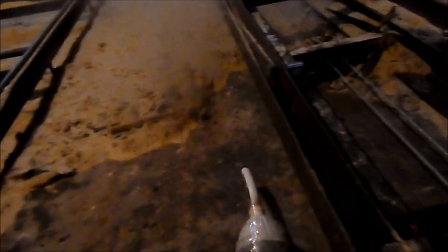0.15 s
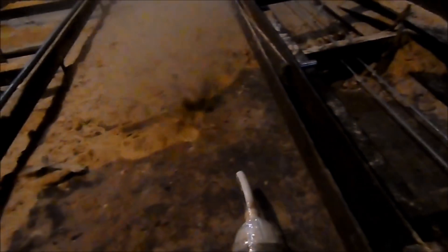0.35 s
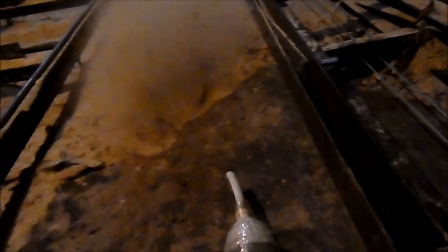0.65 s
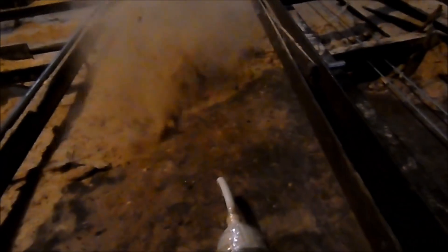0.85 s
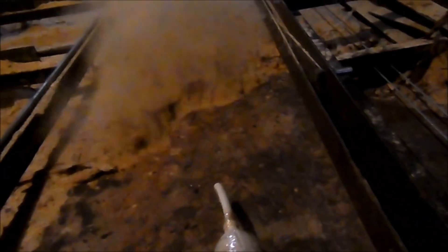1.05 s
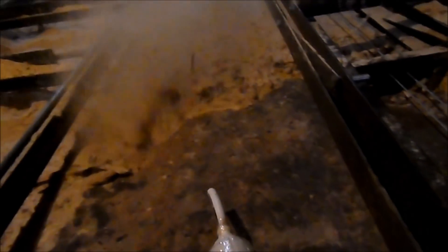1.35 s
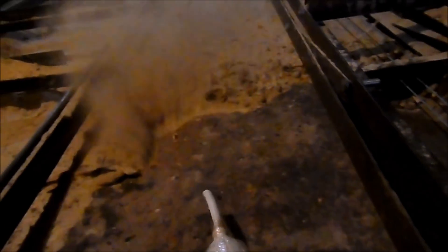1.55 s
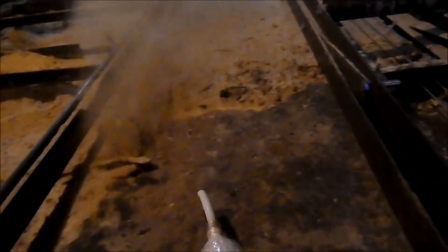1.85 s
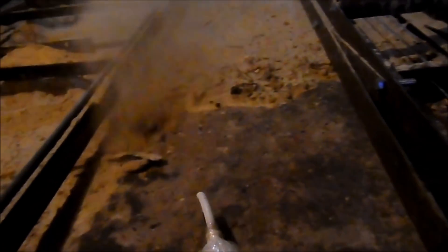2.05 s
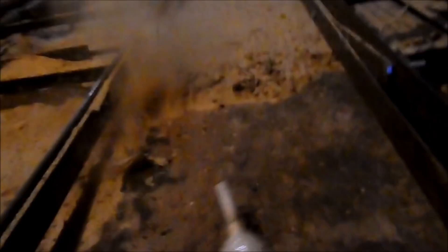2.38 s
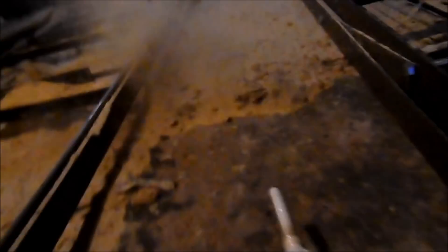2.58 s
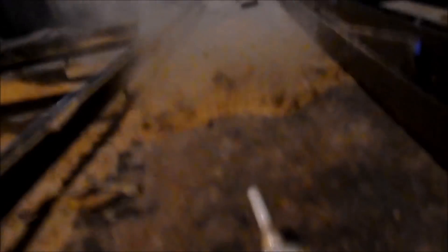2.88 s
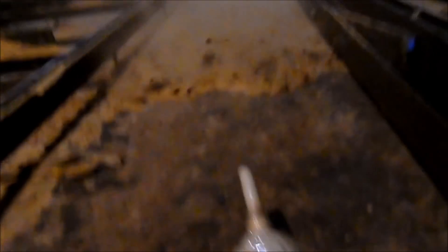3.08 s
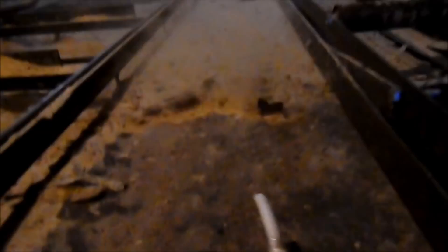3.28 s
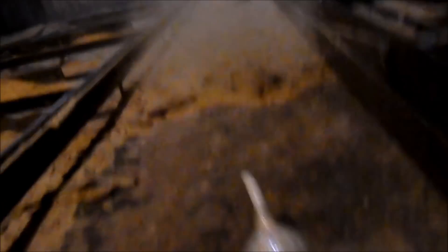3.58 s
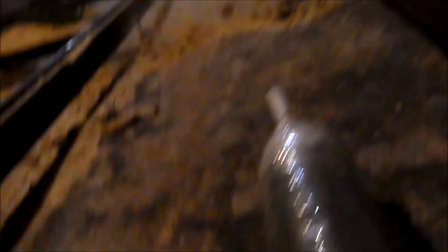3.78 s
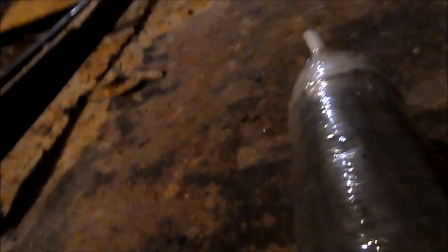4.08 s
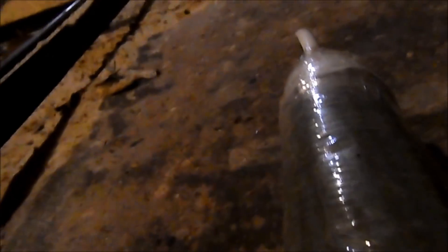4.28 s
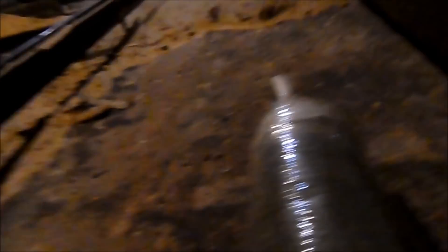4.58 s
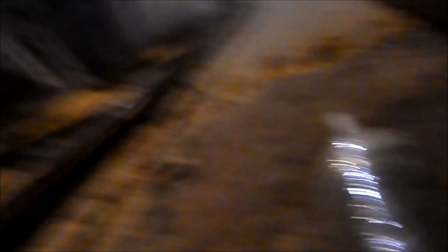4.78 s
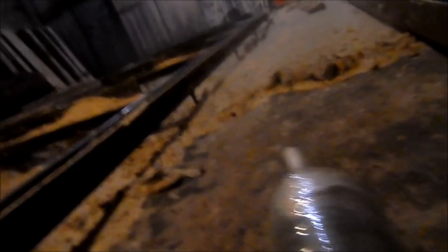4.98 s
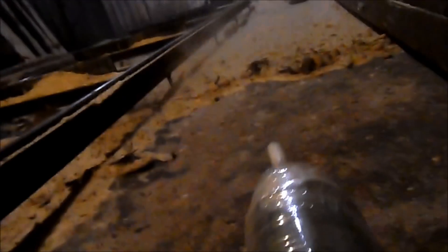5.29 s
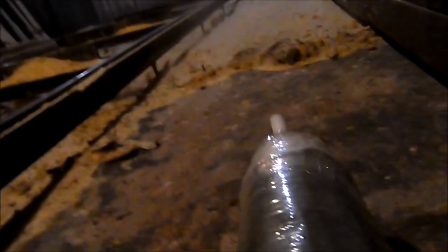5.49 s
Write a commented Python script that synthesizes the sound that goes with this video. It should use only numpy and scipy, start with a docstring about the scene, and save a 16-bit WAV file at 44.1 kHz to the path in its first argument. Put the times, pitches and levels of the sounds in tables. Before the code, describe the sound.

Already running at the start, a blower pushes out a broad, sharp rush of air over a dusty floor between metal rails. Its motor drones steadily with brief buzzy bursts, and the fan tone wavers and sags slightly. Midway the hiss turns duller and the motor side more exposed, with gusts thudding on the close microphone; the fan whine stands out near the end. No stop, little room sound, centred image.

```python
"""A blower is swept by hand over a dusty floor between metal rails. From the start a motor hums on a stack of
orders with bursts of buzz, a fan adds a blade tone that sags as the load changes, and noise hisses from the
nozzle with an echo notch that slides as the nozzle swings. Gusts thump on the microphone from about 0.6 s,
over a faint breeze, and thin whistles glide and fade from 0.8 s. Tones are wavering sines, air is noise built
from random short-time spectra, and gusts are low-passed noise. Both channels are alike."""
import sys
import numpy as np
from scipy import signal
from scipy.io import wavfile
from scipy.ndimage import uniform_filter1d

SR = 44100
rng = np.random.default_rng(int(sys.argv[2]) if len(sys.argv) > 2 else 0)


def transcribe(u):
    """Save the signal u as a 16-bit wav file named by the first command-line argument.

    u: samples, shape (n,) or (channels, n), limited to [-1, 1]; the rate is SR.
    q: integer samples, one column per channel.
    """
    v = np.clip(np.atleast_2d(u).T, -1, 1)
    q = np.round(v * 32767).astype(np.int16)
    wavfile.write(sys.argv[1], SR, q)


N = 248724  # length in samples


def gain_of(db):
    """Decibel law: 20 dB is a factor of ten in amplitude."""
    return 10 ** (np.asarray(db) / 20)


def evened(x):
    """Normalisation: scale a signal to an rms of 1."""
    return x / np.sqrt(np.mean(x ** 2) + 1e-20)


def read(points, hz):
    """Spectral envelope: interpolate levels in dB over log frequency, near silence outside."""
    f, value = np.transpose(points)
    return np.interp(np.log(hz + 1), np.log(f + 1), value, left=-120, right=-120)


def follow(rows, t):
    """Piecewise-linear control: columns of a curve table at the times t."""
    s, *columns = np.transpose(rows)
    return [np.interp(t, s, c) for c in columns]


def drift(rate_hz):
    """Slow random modulation: sines of random phase up to rate_hz, together of rms 1."""
    t = np.arange(0, N / SR + .01, .002)
    slow = 0
    for f in rate_hz * np.geomspace(.05, 1, num=16):
        slow = slow + np.sin(2 * np.pi * (f * t + rng.random())) / np.sqrt(f)
    return np.interp(np.arange(N) / SR, t, evened(slow))


def tone(hz, db, width_hz=0., waver_db=0., waver_hz=8.):
    """Phase integration: a sine whose pitch trembles by width_hz rms and whose level wavers about db."""
    turns = np.cumsum(hz + width_hz * drift(30.)) / SR + rng.random()
    level = gain_of(db + waver_db * drift(waver_hz))
    return np.sqrt(2) * level * np.sin(2 * np.pi * turns)


def rumble(hz):
    """Low-pass filtering: two one-pole stages make noise that falls away above hz, rms 1."""
    r = np.exp(-2 * np.pi * hz / SR)
    once = signal.lfilter([1], [1, -r], rng.standard_normal(N))
    return evened(signal.lfilter([1], [1, -r], once))


# how the blower is held, also followed by the fan and the air:
# time_s, aim (near 1 nozzle side, near -1 motor side), stream_swell_db, top_octave_db (before the air's lift)
POSE = [(0, 0.95, 3, -40), (.4, .75, 4.5, -38), (.7, 0.37, 3.5, -37), (.85, 0.39, 1, -35),
        (1.7, 0.37, 0, -36), (2.15, 0.44, -2, -36), (2.5, 0.24, -0.5, -34.5), (2.58, 0.29, 0.5, -31),
        (2.75, -0.33, -1, -34.5), (2.9, -.5, 2.5, -38), (3.15, -0.79, -0.5, -40), (3.45, -0.68, -3.5, -47),
        (3.7, -1.14, -0.5, -42), (3.95, -0.43, 1, -38), (4.8, -0.48, 1.5, -35), (5.1, -.6, 1.5, -36),
        (5.3, -0.71, 3, -38), (5.64, -0.45, 2.5, -36)]
# motor hum: time_s, hum_db, octave_db
HUM = [(0.0, -24.5, -43), (0.3, -27.5, -41), (0.52, -24.5, -35.5), (1.13, -21.5, -32.5),
       (1.3, -22.5, -35.5), (1.48, -20, -32), (2.32, -19.5, -36), (2.97, -21, -29), (3.24, -19.5, -36),
       (3.3, -20.5, -42), (3.36, -21.5, -32), (3.69, -21.5, -35.5), (3.83, -23, -30), (4.23, -25, -34.5),
       (5.28, -30.5, -28.5), (5.37, -25.5, -32), (5.59, -22.5, -30.5), (5.64, -27, -37)]
# third order, fourth order, whine, buzz between bursts: level_db at zero aim and swell, tilt_db per unit of aim
TURNING = [(-47.5, -4.5), (-49, -9), (-51.5, -9.5), (-44, 2.5)]
# flares of the buzz: start_s, length_s, level_db
BUZZES = [(0.035, 0.12, -39.5), (0.355, 0.17, -36.5), (0.553, 0.13, -34), (0.888, 0.15, -39),
          (1.19, 0.153, -35), (1.525, 0.22, -36.5), (2.29, 0.25, -40.5), (3.402, .13, -39),
          (3.845, 0.31, -38), (5.31, .3, -32.5)]
# weaker orders of the hum: multiple of the hum pitch, level_db at zero swell
HUM_ORDERS = [(1.5, -59.5), (5, -60), (7, -49), (8, -54), (9, -47.5), (10, -56), (11, -48.5), (18, -50),
              (27, -65)]
# faint tone just above the hum that beats with it: time_s, level_db
BEAT = [(0, -46), (1, -47), (2.7, -48), (3.2, -39), (3.9, -50), (4.2, -45), (4.5, -39), (4.8, -46),
        (5.3, -37), (5.64, -41)]
# other steady tones, a low mains hum near 100 Hz, then fuzzier motor tones:
# pitch_hz, width_hz (four times the rms tremble), level_db
TONES = [(102.6, 5.4, -62), (1040, 4.8, -88), (1120, 6.9, -63), (1236, 2.8, -55), (1565, 3.1, -50),
         (1695, 7.9, -67), (1782, 4.9, -62), (2016, 7.5, -50), (2026, 8.5, -57), (2470, 11, -49.5),
         (3576, 11, -55), (4460, 13, -61), (4920, 9.2, -49.5), (5420, 15.2, -51), (5680, 23, -48),
         (6180, 6.7, -49), (7600, 12, -53)]
HUM_HZ, BEAT_HZ = 463.9, 476
BUZZ_HZ, BUZZ_PAIR_HZ, WHINE_HZ = 1502, 1549, 3358
BUZZ_EDGE_S = 0.014


def motor():
    """Harmonic series with amplitude modulation: hum, orders, buzz, whine and other steady tones, one of mains hum."""
    t = np.arange(N) / SR
    aim, swell_db, _ = follow(POSE, t)
    hum_db, octave_db = follow(HUM, t)
    third_db, fourth_db, whine_db, buzz_db = (db + tilt_db * aim for db, tilt_db in TURNING)
    third_db = third_db + 0.96 * swell_db
    fourth_db = fourth_db + 0.22 * swell_db

    # turbulence shakes the level: noise on both sides of the line
    hz = HUM_HZ + 0.3 * drift(12.)
    out = tone(hz, hum_db) * (1 + 0.056 * rumble(30.0))
    out += tone(2 * hz, octave_db) * (1 + 0.091 * rumble(33.0))
    out += tone(3 * hz, third_db, waver_db=0.5)
    out += tone(4 * hz, fourth_db, waver_db=1.5)

    flares = 0
    for start, length, db in BUZZES:
        edge_distance = np.minimum(t - start, start + length - t)
        flares = flares + gain_of(db) * np.clip(edge_distance / BUZZ_EDGE_S, 0, 1)
    buzz = tone(BUZZ_HZ, 0, width_hz=1.7, waver_db=2.5, waver_hz=24.87)
    buzz += tone(BUZZ_PAIR_HZ, -8.5, width_hz=2.2, waver_db=5.5, waver_hz=2.93)
    out += np.maximum(flares, gain_of(buzz_db)) * buzz

    out += tone(WHINE_HZ, whine_db, width_hz=6.0, waver_db=6.0, waver_hz=25.27)
    for k, db in HUM_ORDERS:
        out += tone(k * hz, db + 0.93 * swell_db, width_hz=1.4, waver_db=2.5, waver_hz=15.0)
    out += tone(BEAT_HZ, *follow(BEAT, t), width_hz=3.9, waver_db=0.5, waver_hz=4.2)
    for f, width_hz, db in TONES:
        out += tone(f, db, width_hz=0.25 * width_hz, waver_db=1.5, waver_hz=15.)
    return out


# fan levels: time_s, blade_db, others_db (reference for most upper multiples and shaft orders)
FAN = [(0, -43, -60), (.17, -34.5, -58), (.4, -45.5, -58), (.6, -46, -62), (.7, -33.5, -62),
       (1.05, -31.5, -60), (1.36, -33.5, -58), (1.46, -42, -56), (1.51, -33, -54), (1.63, -43, -58),
       (1.7, -33.5, -56), (2.08, -53, -60), (2.28, -41, -58), (2.72, -42, -56), (2.83, -35.5, -65),
       (3.15, -33.5, -45), (3.58, -40.5, -55), (3.75, -38, -54), (3.92, -36, -45), (4.15, -32, -44),
       (5.2, -27.5, -39.5), (5.3, -32, -43), (5.45, -43, -40.5), (5.64, -32, -42)]
# pitch of the ten-bladed fan, which slows under load: time_s, blade_hz
FAN_SPEED = [(0, 2960), (1.3, 2933), (2.3, 2893), (3.1, 2914), (3.6, 2870), (3.9, 2845), (4.15, 2861),
             (5.64, 2870)]


def fan():
    """Blade passing: a tone at ten times the shaft rate, its multiples, and shaft orders just below them."""
    t = np.arange(N) / SR
    aim = follow(POSE, t)[0]
    blade_db, others_db = follow(FAN, t)
    hz = follow(FAN_SPEED, t)[0] + 4.0 * drift(25.)
    out = tone(hz, blade_db) * (1 + 0.12 * rumble(16.0))
    second_db = -44 + .4 * (blade_db + 30) + 3.9 * aim
    out += tone(2 * hz, second_db, waver_db=2.0, waver_hz=18.0)
    fourth = tone(4 * hz, others_db + 1.5, width_hz=25., waver_db=4.5, waver_hz=20.)
    out += fourth * (1 + 0.27 * rumble(190.0))
    for k, db in ((39 / 10, -4.), (5, -7.)):
        out += tone(k * hz, others_db + db, width_hz=14.4, waver_db=0.5, waver_hz=20.)
    return out + tone(9 / 10 * hz, others_db - 1.0, waver_db=3., waver_hz=20.)


def noise(power, patchy_db, flicker_db):
    """Inverse short-time Fourier synthesis: random spectra (bins x frames) with patches and broad flicker."""
    a, b, patches = rng.standard_normal((power.shape[1], power.shape[0], 3)).T
    patches = uniform_filter1d(patches, size=14, axis=0)  # across bins
    patches = evened(uniform_filter1d(patches, size=16, axis=1))  # across frames
    flicker = evened(uniform_filter1d(a, size=200, axis=0))  # shared by neighbouring bins
    z = (a + 1j * b) * np.sqrt(power) * gain_of(patchy_db * patches + flicker_db * flicker)
    return signal.istft(z * np.sqrt(3 / 8), nperseg=1024, noverlap=768)[1][:N]


# roar, rush, hiss, fizz: relative_level_db (before the lift), tilt_db per unit of aim, share of the swell
AIR = [(-39, -3, .8), (-38, -1, 1), (-36, 5.5, .4), (-38, 3.5, 0.6)]
# colour of each part of the stream: frequency_hz, relative_density_db per Hz
ROAR = [(20, -12), (100, -22), (300, -20), (600, -18), (900, -7), (1200, -13), (1600, -5), (2200, -9),
        (3000, -10.5), (4000, -25)]
RUSH = [(2500, -20), (3300, -5.5), (4000, -10.5), (5000, -7), (6000, -13.5)]
HISS = [(4800, -22.5), (5800, -4), (6800, -0.5), (7600, -5.5), (8600, -8.5), (9600, -12)]
FIZZ = [(8000, -10), (9200, -8), (10800, -5), (12000, -7), (13000, -11), (14500, -41)]
TOP = [(11000, -38), (12600, -7.5), (13600, -6), (14600, -7.5), (16500, -8.5), (19000, -13)]
# dip cut by the floor echo: time_s, notch_hz, depth_db (negative is a bump)
NOTCH = [(0, 8650, 8), (1, 9000, 4), (2.42, 9600, 2.5), (2.6, 7900, 8), (2.8, 6800, 4), (3, 7500, 0),
         (3.5, 7650, 1.5), (4, 8700, -2.5), (5.64, 9500, -1.3)]
UPPER_NOTCH_HZ, UPPER_NOTCH_SHARE = 13000, 0.6  # share of the main depth


def air():
    """Jet noise and echo interference: five bands swell apart with aim, under two sliding notches and a fixed one."""
    hz = np.fft.rfftfreq(1024, 1 / SR)
    t = np.arange(N // 256 + 5) * 256 / SR
    aim, swell_db, top_db = follow(POSE, t)
    levels_db = [db + tilt_db * aim + share * swell_db for db, tilt_db, share in AIR] + [top_db]
    power = 0
    for colour, db in zip((ROAR, RUSH, HISS, FIZZ, TOP), levels_db):
        shape = gain_of(2 * read(colour, hz))  # doubled dB: power, not amplitude
        power = power + np.outer(shape / shape.sum(), gain_of(2 * db))

    notch_hz, depth_db = follow(NOTCH, t)
    rows_hz = hz[:, None]
    dip_db = depth_db * np.exp(-((rows_hz - notch_hz) / 940.0) ** 2)
    dip_db += UPPER_NOTCH_SHARE * depth_db * np.exp(-((rows_hz - UPPER_NOTCH_HZ) / 710.0) ** 2)
    dip_db += 0.56 * depth_db * np.exp(-((rows_hz - 0.387 * notch_hz) / 760.0) ** 2)
    lift = gain_of(8.)
    return lift * noise(power * gain_of(-2 * dip_db), patchy_db=1.3, flicker_db=0.97)


# breeze between the gusts: time_s, level_db
BREEZE = [(0, -61), (.5, -56), (.75, -50), (1, -49), (1.12, -61), (2.9, -65), (3.4, -53), (4.2, -49),
          (5.64, -45)]
# gusts on the microphone: peak_s, level_db, length_s
GUSTS = [(0.636, -31, 0.068), (1.035, -34, 0.039), (3.176, -32, 0.058), (3.697, -23.5, 0.095),
         (3.78, -29, 0.11), (3.892, -32, .04), (4.095, -39, .04), (4.247, -38, 0.045), (4.322, -37, .06),
         (4.52, -35, 0.043), (4.596, -36.5, 0.077), (4.777, -31, 0.046), (4.914, -34, 0.045),
         (5.015, -33, 0.1), (5.172, -45, .05), (5.585, -32, 0.054)]
GUST_RISE_DB, GUST_FALL_DB = 19, 20  # drop one length before and after the peak


def gusts():
    """Turbulent pressure on a microphone: low swings of fairly even size, with a faster flutter on top."""
    t = np.arange(N) / SR
    level = gain_of(follow(BREEZE, t)[0])
    for peak, db, length in GUSTS:
        drop_db = np.maximum(GUST_RISE_DB * (peak - t), GUST_FALL_DB * (t - peak)) / length
        level = np.maximum(level, gain_of(db - drop_db))
    swings = rumble(47.0) + (0.043 + 2.2 * level) * rumble(83.0)  # hard gusts flutter more
    local_rms = np.sqrt(uniform_filter1d(swings ** 2, size=2500))
    return level * swings / local_rms


# whistles at the nozzle lip: start_s, length_s, first_hz, last_hz, level_db (at the top of the swell)
WHISTLES = [(0.798, 1.7, 6700, 7040, -41), (2.9, 0.57, 12000, 12100, -45), (3.498, .65, 3420, 3730, -38.5),
            (3.517, 0.42, 7000, 7460, -46), (3.9, 1.9, 11920, 11800, -47)]
SETTLE = 0.25  # share of the length in which the pitch settles
WHISTLE_FADE = 0.42  # roundness of the swell


def whistles():
    """Edge tones: thin sines glide exponentially to their last pitch, swell and fade as the nozzle turns."""
    out = 0
    for start, length, first_hz, last_hz, db in WHISTLES:
        u = np.clip((np.arange(N) / SR - start) / length, 0, 1)
        hz = last_hz + (first_hz - last_hz) * np.exp(-u / SETTLE)
        swell = abs(np.sin(np.pi * u)) ** WHISTLE_FADE * (u < 1)
        whistle = tone(hz, db, width_hz=12.4, waver_db=1.5, waver_hz=20.)
        out = out + swell * whistle * (1 + 0.2 * rumble(44.0))
    return out


def scene():
    """Superposition: all sources add, alike in both channels."""
    mono = motor() + fan() + air() + gusts() + whistles()
    return np.array([mono, mono])


EDGE_HZ = 15780


def record(dry):
    """Band limitation: the recorder passes little above EDGE_HZ, by a linear-phase low-pass filter."""
    low_pass = signal.firwin(1023, EDGE_HZ, window=("kaiser", 9), fs=SR)
    return signal.oaconvolve(dry, low_pass[None], "same")


dry = scene()
out = record(dry)
transcribe(out)
```